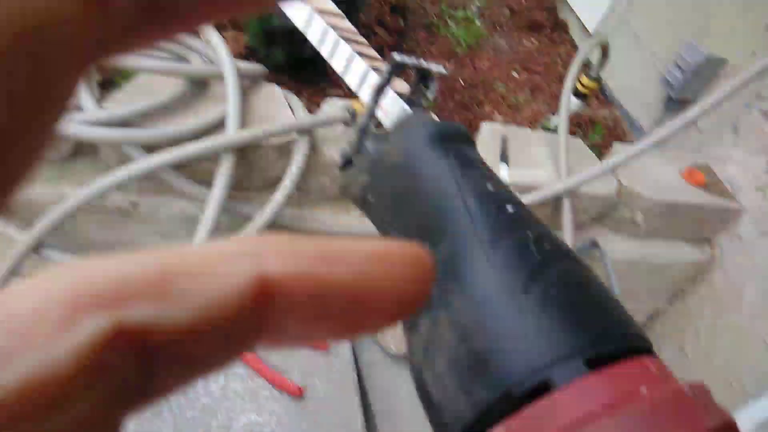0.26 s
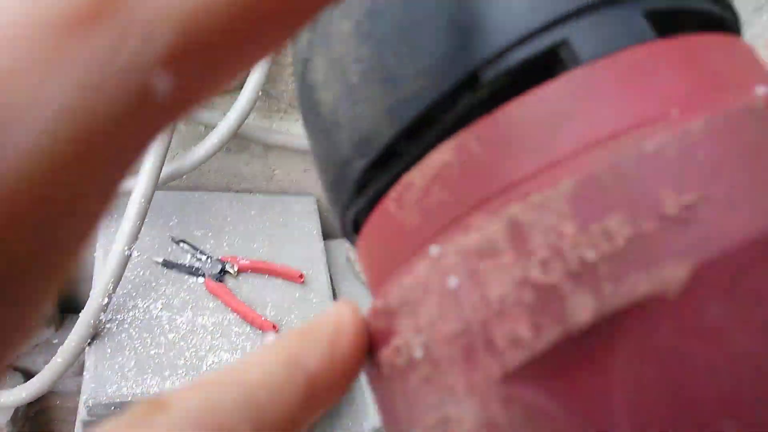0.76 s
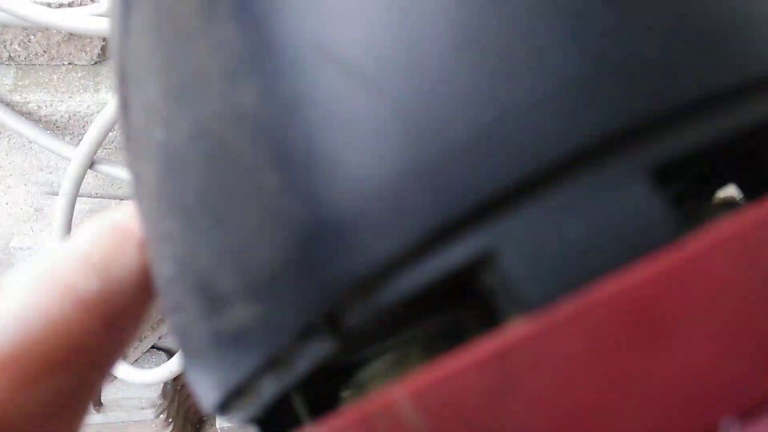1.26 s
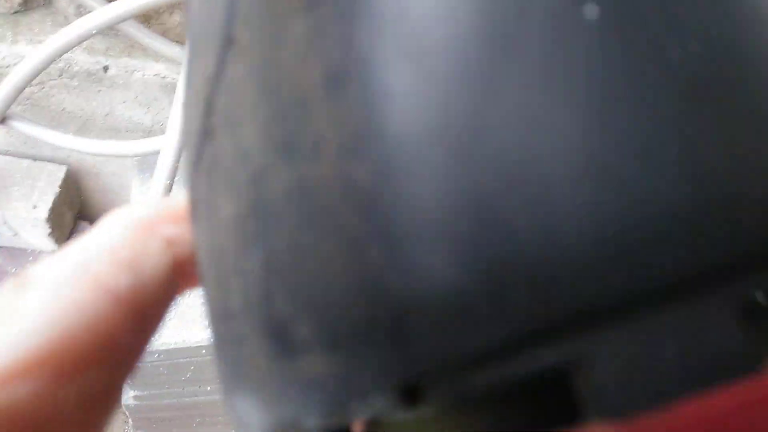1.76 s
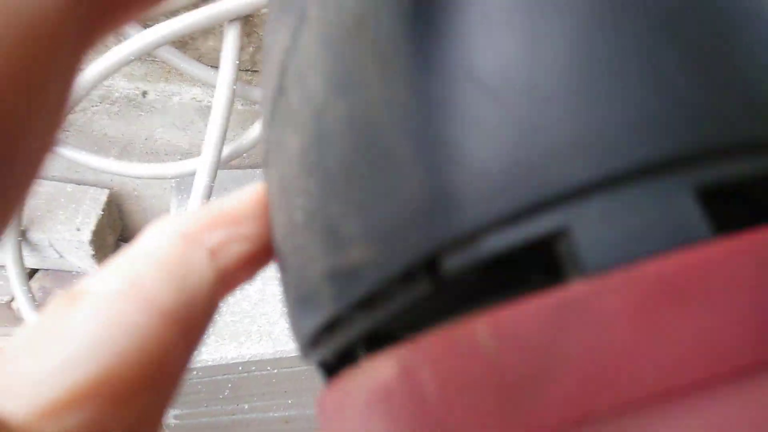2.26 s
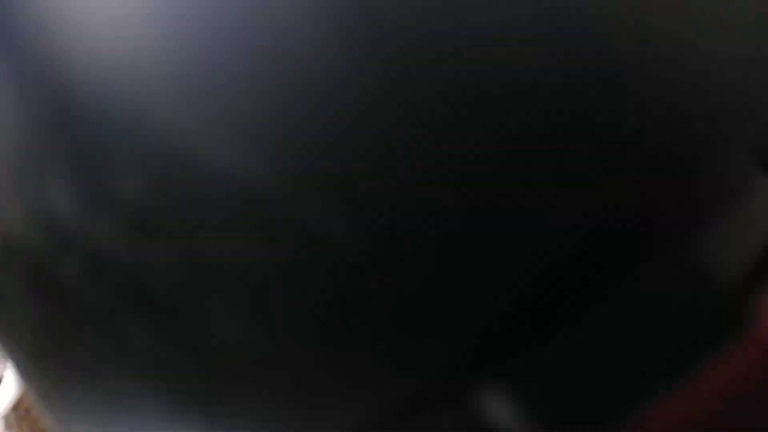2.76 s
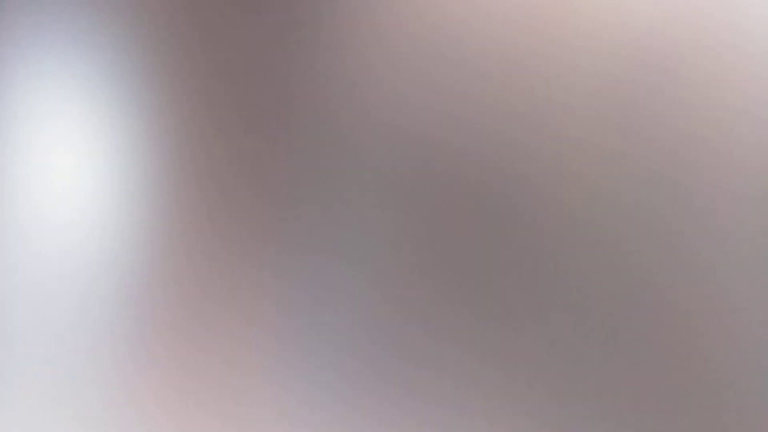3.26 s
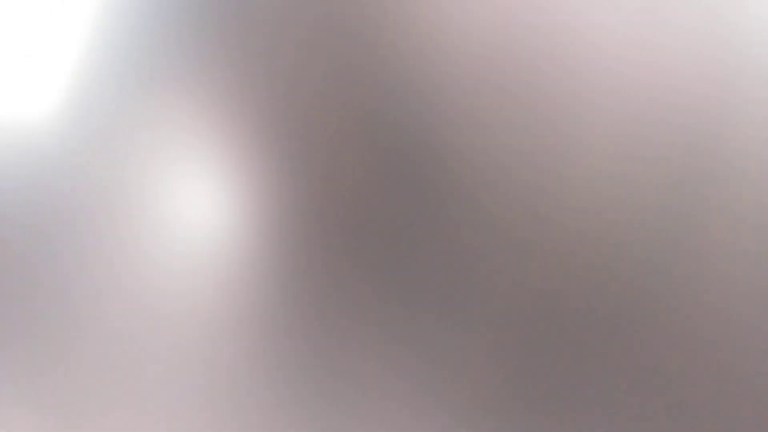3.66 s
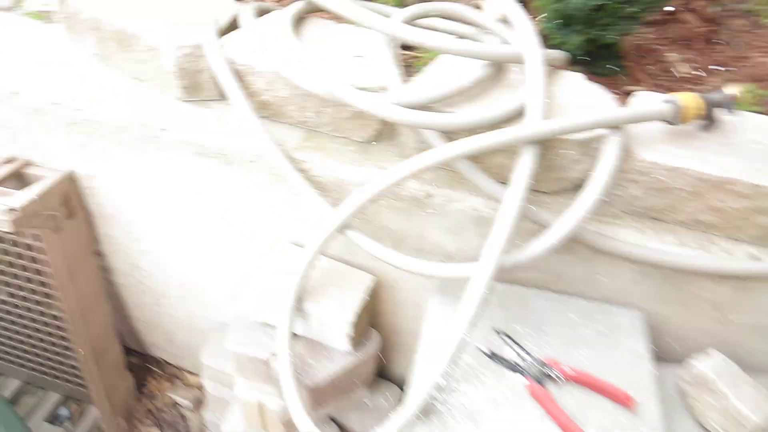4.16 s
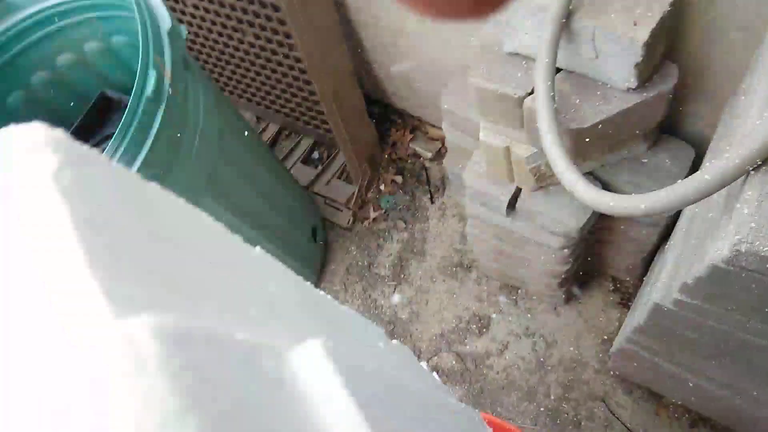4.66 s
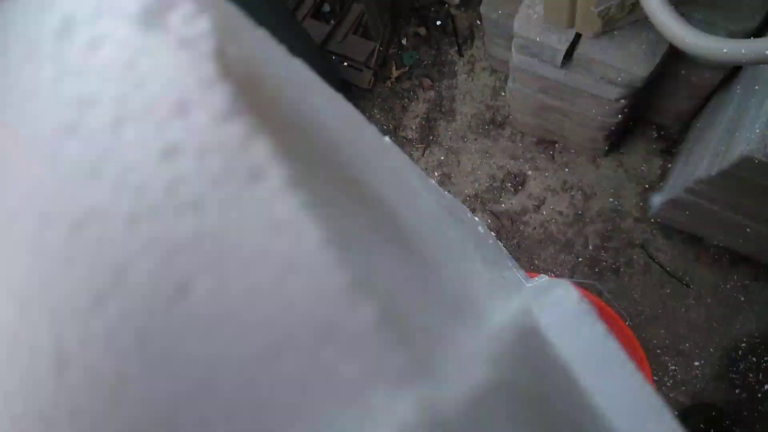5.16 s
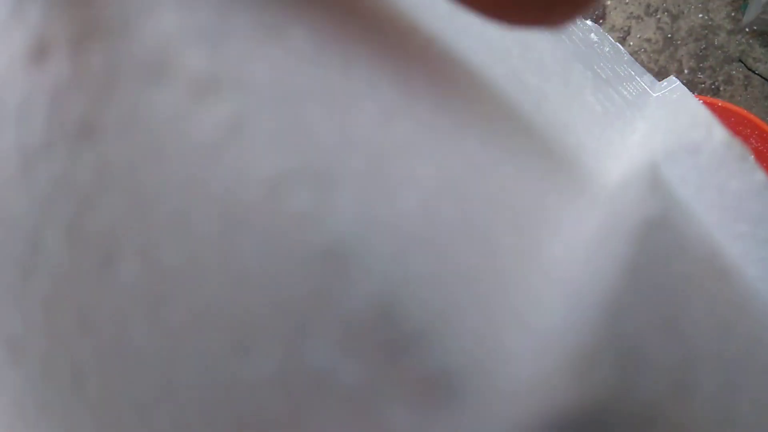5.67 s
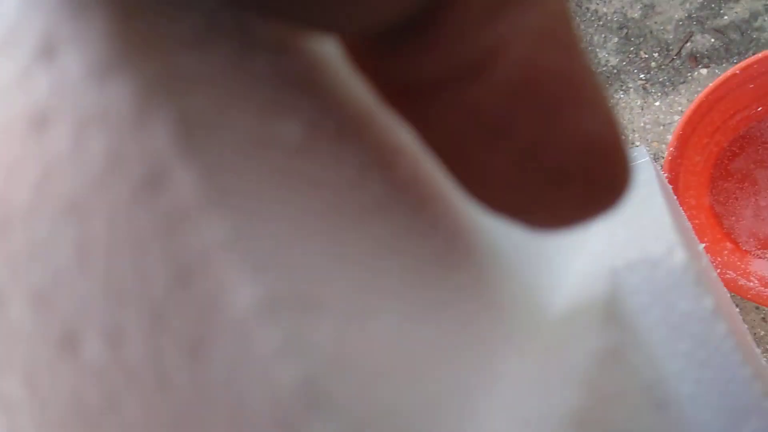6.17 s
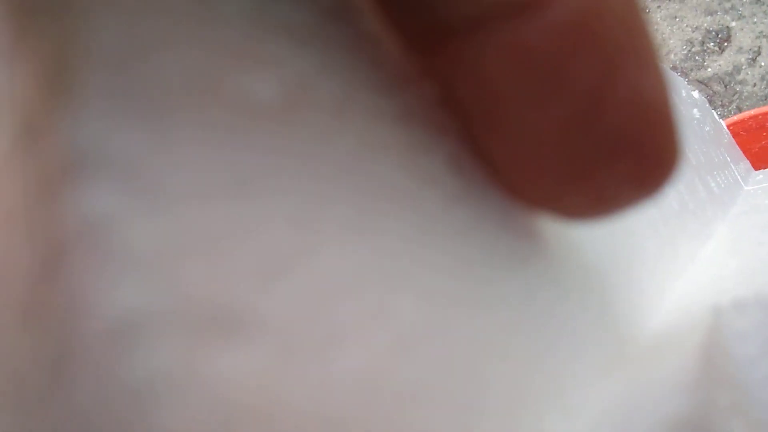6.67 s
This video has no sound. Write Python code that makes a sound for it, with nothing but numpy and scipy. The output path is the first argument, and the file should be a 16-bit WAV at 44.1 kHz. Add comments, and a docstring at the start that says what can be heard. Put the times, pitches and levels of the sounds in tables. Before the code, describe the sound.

Nearly silent at first, with a hand rubbing and shifting on a tool, dull thumps and crisp catch clicks near the microphones. Then the trigger cracks and an electric saw surges to full speed, overloading slightly, its plunger hammering too fast to count. The roar shifts from right to left, its low airflow easing on the right, while tones waver and gusts bump the left microphone until the cut-off.

```python
"""Outdoors, a hand-held reciprocating saw is gripped with rustles, bumps and clicks, then switched on near two microphones.
Filtered noise makes the rubbing hand and moving air; decaying modes of the plastic shell make the clicks ring.
The armature winds up: harmonics of its rotation whine, the plunger knocks on the shell, gears whir and fan air hisses.
Then the tool swings round to the left and a little away. The loudest peaks are clipped."""
import sys
import numpy as np
from scipy import signal
from scipy.io import wavfile
from scipy.ndimage import uniform_filter1d, map_coordinates

SR = 44100
rng = np.random.default_rng(int(sys.argv[2]) if len(sys.argv) > 2 else 0)


def amplitude_ratio(level_db):
    """Convert a level in decibels to the matching linear amplitude (field) ratio."""
    exponent = np.asarray(level_db, float) / 20
    return 10 ** exponent


def master(y):
    """Save y as 16-bit WAV."""
    cut = np.clip(np.atleast_2d(y).T, -1, 1)
    pcm = np.round(cut * 32767)  # scale
    wavfile.write(sys.argv[1], SR, pcm.astype(np.int16))


N = 305613

PINION, WHEEL = 10, 92  # gear teeth: the wheel makes one stroke a turn
ON_S, FULL_TURNS_PER_S, SAG_TURNS_PER_S2 = 1.698, 399.07, 0.424  # the armature sags a little as it warms
# the tool swings from the right microphone to the left, and later rolls its vents back into view
SWING_S, SWING_LENGTH_S, ROLL_S, ROLL_LENGTH_S = 3.95, 0.595, 4.9, 0.5


def evened(x):
    """Normalization by mean power: each channel gets rms 1."""
    return x / np.sqrt(np.mean(x ** 2, -1, keepdims=True) + 1e-20)


def columns(rows):
    """Linear interpolation in time: table columns become one value a sample."""
    s, *values = np.transpose(rows)
    return [np.interp(np.arange(N) / SR, s, v) for v in values]


def placed(db, left_minus_right_db):
    """Powers of unrelated signals add: gains of two such channels whose mean has the level db."""
    return 2 * amplitude_ratio(db) / np.sqrt(1 + amplitude_ratio([-left_minus_right_db, left_minus_right_db]) ** 2)


def wander(hz):
    """Low-passed white noise: a slow random curve of rms 1 for each channel."""
    low_pass = signal.butter(2, hz, fs=SR, output="sos")
    return evened(signal.sosfilt(low_pass, rng.standard_normal((2, N))))


def noise(colour, patchy_db):
    """Random short-time spectra with drifting patches, unrelated left and right, superpose to coloured noise."""
    hz = np.fft.rfftfreq(1024, 1 / SR)
    colour_hz, colour_db = np.transpose(colour)
    real, imaginary, patches = rng.standard_normal((N // 256 + 5, 513, 2, 3)).T
    patches = uniform_filter1d(patches, size=14, axis=1)  # along frequency
    patches = uniform_filter1d(patches, size=12, axis=2)  # along time
    shape_db = np.interp(np.log(hz + 1), np.log(colour_hz), colour_db)[:, None]
    shape_db = shape_db + patchy_db * patches / patches.std()
    spectra = (real + 1j * imaginary) * amplitude_ratio(shape_db)
    return evened(signal.istft(spectra, nperseg=1024, noverlap=768)[1][:, :N])


def swells(s, length, db):
    """Powers of unrelated events add: the gain of summed flat-topped swells."""
    u = (np.arange(N) / SR - np.c_[s]) / np.c_[length]
    shape = np.clip(np.minimum(2.2 * u, 0.96 * (1.15 - u)), 0, 1)
    return np.sqrt((amplitude_ratio(np.c_[db]) ** 2 * shape ** 2).sum(0))


def ramp(s, length):
    """A squared-sine transition rises smoothly from 0 to 1."""
    return np.sin(np.pi / 2 * np.clip((np.arange(N) / SR - s) / length, 0, 1)) ** 2


def speed():
    """Exponential approach to full speed: armature turns per second."""
    # the two stages, quick and slow: missing_turns_per_s at the start, time_constant_s
    wind_up = [(211.5, .127), (133.2, .448)]
    t = np.maximum(np.arange(N) / SR - ON_S, 0)
    missing = sum(gap * np.exp(-t / lag_s) for gap, lag_s in wind_up)
    return FULL_TURNS_PER_S - SAG_TURNS_PER_S2 * t - missing


def heard_db(levels_db, rule, start=SWING_S, length=SWING_LENGTH_S):
    """Level grows with the logarithm of motor speed and follows the swing of the tool.

    levels_db: left, right before, left, right after; rule: dB per octave of speed, dB at mid-swing, dB lost per s."""
    before, after = np.reshape(levels_db, (2, 2, 1))
    spin_db, sweep_db, fade_db_per_s = rule
    swing = ramp(start, length)
    since = np.maximum(np.arange(N) / SR - start - length, 0)
    moving = [4 * sweep_db * swing * (1 - swing), -fade_db_per_s * since]  # left, right
    return before + (after - before) * swing + moving + spin_db * np.log2(speed() / FULL_TURNS_PER_S)


def left_lag_ms():
    """Path difference sets arrival time: how much later the left microphone hears the tool."""
    before_ms, after_ms = 0.7535, -0.764
    return before_ms + (after_ms - before_ms) * ramp(SWING_S, SWING_LENGTH_S)


def from_one_spot(pair):
    """Partial coherence: a share of the right channel reaches the left as well, after the path delay."""
    alike, lag_waver_ms = 0.28, 0.04  # the delay wavers with the hand's unsteadiness
    lag_ms = left_lag_ms() + lag_waver_ms * wander(1.03)[0]
    at = np.arange(N) - lag_ms * SR / 1000
    common = map_coordinates(pair[1], [at], order=3)
    return np.array([alike * common + np.sqrt(1 - alike ** 2) * pair[0], pair[1]])


def rustle():
    """Friction noise: light strokes mostly brush; firm ones add grainy rubbing of skin, duller at the right."""
    # strokes of hand and cloth: start_s, length_s, left_db, right_db
    strokes = [(-.2, 1, -79, -64), (0.197, 0.29, -61, -54), (0.413, 0.058, -76, -43),
               (0.533, 0.3, -78, -55.5), (0.786, 0.16, -76, -53), (0.887, 0.29, -62, -43.5),
               (1.034, 0.18, -42, -39), (1.185, 0.27, -43, -39), (1.443, 0.43, -71, -56),
               (1.514, 0.038, -62, -43.5), (1.656, 0.16, -48, -28)]
    # spectrum of rubbing at each microphone: frequency_hz, density_db (per Hz)
    rub_left = [(200, -15), (1000, 2), (2500, -10), (5500, -11), (8000, -6), (11300, -7), (12500, -40)]
    rub_right = [(200, -34), (900, -0.5), (2200, -7), (4000, -3.5), (6000, -11), (9000, -33), (12500, -49)]
    # spectrum of brushing cloth: frequency_hz, density_db (per Hz)
    brush_colour = [(1500, -38), (2500, 2.5), (3200, 1.5), (4000, 2.5), (4800, 0.5), (7000, -14),
                    (11000, -10), (12500, -42)]
    firm_right_db, firm_growth, brush_db, brush_top_db = -42, 0.67, -2, -50
    s, length, *sides_db = np.transpose(strokes)
    rub = np.array([noise(rub_left, patchy_db=3.5)[0], noise(rub_right, patchy_db=2.5)[1]])
    grainy = evened(rub * amplitude_ratio(5.3 * wander(140)))
    # firmer strokes bring out more rubbing, while brushing stops growing at brush_top_db
    firm_db = firm_growth * np.minimum(sides_db[1] - firm_right_db, 0)
    rub_gain = np.array([swells(s, length, db + firm_db) for db in sides_db])
    brush_gain = np.array([swells(s, length, np.minimum(db, brush_top_db) + brush_db) for db in sides_db])
    return rub_gain * grainy + brush_gain * noise(brush_colour, patchy_db=4.5)


def running():
    """Switching envelope: a short linear rise once the trigger closes."""
    return np.clip((np.arange(N) / SR - ON_S) / 0.0085, 0, 1)


def buffet():
    """Turbulent pressure is local: lumpy low noise, unrelated at the two ports; the gusts are deeper."""
    # spectra of steady buffeting and of gusts: frequency_hz, density_db (per Hz)
    steady_colour = [(25, -47), (75, -4.5), (120, -1), (220, 0.5), (400, -2), (800, -3.5), (1500, -49),
                     (3000, -98)]
    gust_colour = [(25, -19), (70, 6.5), (130, 8.5), (220, -4.5), (500, -11), (3000, -84)]
    # gusts on the left port: start_s, length_s, level_db
    gust_times = [(3.507, 0.064, -15), (4.142, .16, -20.5), (4.416, 0.28, -17), (5.884, 0.048, -17),
                  (6.165, 0.2, -16), (6.396, 0.066, -19.5), (6.46, 0.38, -7), (6.851, 0.065, -18.5)]
    # low rumble while the hand shifts its grip: start_s, length_s, left_db, right_db
    grip = [(0.91, 0.2, -70, -48), (1.1, 0.44, -58, -59)]
    still_air_db = np.array([[-72], [-88]])  # left, right
    # the jet of cooling air leaves the right port from 3.82 s, over 0.45 s
    jet_db = heard_db((-26, -16, -35.5, -41), (9.5, 9.6, 0.8), start=3.82, length=0.45)
    s, length, left_db, right_db = np.transpose(grip)
    level = running() * amplitude_ratio(jet_db) + [swells(s, length, left_db), swells(s, length, right_db)]
    steady = level * evened(noise(steady_colour, patchy_db=1.4) * amplitude_ratio(1.3 * wander(12)))
    gusty = evened(noise(gust_colour, patchy_db=0.0) * amplitude_ratio(4.7 * wander(18.0)))[0]
    still_air = amplitude_ratio(still_air_db) * noise(gust_colour, patchy_db=5.0)
    return steady + still_air + [swells(*np.transpose(gust_times)) * gusty, np.zeros(N)]


def thumps():
    """Damped oscillation: the hand bumps the body that holds the microphones, near the right one."""
    # bumps at the right microphone: start_s, level_db (before the soft onset), pitch_hz, t60_s
    bumps = [(0.926, -17, 113, 0.076), (0.968, -8.5, 152, 0.019), (1.049, -37, 89.5, 0.24)]
    out, t = np.zeros((2, N)), np.arange(6000) / SR
    for s, db, hz, t60 in bumps:
        onset = (1 - np.exp(-t / 0.0042)) ** 2
        bump = onset * amplitude_ratio(db - 60 * t / t60) * np.sin(2 * np.pi * hz * t)
        out[:, round(s * SR):][:, :len(t)] += amplitude_ratio([[-26], [0]]) * bump
    return out


def housing(tilt_db, scatter, focus_db=(0, 0)):
    """Modal superposition: the plastic shell rings, and each microphone hears its modes in other phases.

    tilt_db and focus_db (left, right) count per octave from the mode at 1755 Hz."""
    # modes of the shell: pitch_hz, level_db (before tilt and focus), t60_s
    shell_modes = [(535, -19.5, 0.012), (854, -10, .017), (1205, -4, 0.016), (1632, -3.5, 0.015),
                   (1755, -2.5, 0.02), (1940, -9, 0.025), (2760, -1.5, 0.024), (3720, -6, .012),
                   (4100, -8, 0.01), (4970, -3.5, 0.002), (6700, -19.5, 0.003), (7800, -15, 0.0026)]
    hz, db, t60 = np.transpose(shell_modes)[:, :, None]
    t = np.arange(3000) / SR
    phase = scatter * rng.uniform(-np.pi, np.pi, (2, len(shell_modes), 1))
    octaves = np.log2(hz / 1755)
    mode_db = db + tilt_db * octaves + np.reshape(focus_db, (2, 1, 1)) * abs(octaves)
    modes = amplitude_ratio(mode_db - 60 * t / t60) * np.sin(2 * np.pi * hz * t + phase)
    modes[:, ::2] *= -1  # neighbours in opposite phase fill the valleys between them
    return modes.sum(1) * np.minimum(t / 0.00085, 1)


def clicks():
    """Impulsive excitation: milliseconds of snapping ring the housing; near walls add a short tail."""
    # clicks of catch and trigger: start_s, level_db (of the peaks, relative), left_minus_right_db,
    # tilt_db (brightness per octave)
    snaps = [(0.926, -31, -13, 14), (0.971, -31, -11, 4), (1.075, -2, -11, 6), (1.143, -19, 1, -17),
             (1.188, -23, -6, -2), (1.233, -20, -10, 1), (1.253, -11.5, -4, 16.5), (1.299, 4.5, -9, 9),
             (1.338, -21, -3, 7), (1.41, -25, -3, -4), (1.522, -35, -14, -6), (1.648, -33, -8, -3),
             (1.699, 9.5, -8, 1)]
    out, t = np.zeros((2, N)), np.arange(3000) / SR
    for s, db, left_minus_right_db, tilt_db in snaps:
        snap = rng.standard_normal(300) * np.exp(-t[:300] / 0.0018)
        body = housing(tilt_db, scatter=0.81)
        body *= np.exp(-t / 0.005)  # the gripping hand damps the shell
        body[:, :5] += amplitude_ratio(-20.0 + 0.87 * tilt_db)  # the dry crack, heard directly
        ring = signal.fftconvolve(body, snap[None], axes=1)[:, :len(t)]
        ring /= abs(ring).max(1, keepdims=True)
        out[:, round(s * SR):][:, :len(t)] += ring * placed(db - 7.5, left_minus_right_db)[:, None]
    tail = rng.standard_normal((2, 6000)) * amplitude_ratio(-60 * np.arange(6000) / SR / 0.039)  # t60 39 ms
    return out + amplitude_ratio(-41.5) * signal.oaconvolve(out, tail, axes=1)[:, :N]


def shaft_turns():
    """Phase is the integral of speed: turns of the slightly unsteady armature so far."""
    return np.cumsum(speed() * (1 + 0.000609 * wander(12.0)[0])) / SR


def whine(turns):
    """Harmonics of rotation: commutator and gear-mesh tones waver and throb; the stroke hums below."""
    # whine tones: order (multiple of shaft speed), left_db, right_db (relative),
    # share (of the level that follows octave_db), throb (depth, twice a stroke)
    partials = [(10, -6, -9, .4, .8), (12, 0, 0, 0, .1), (23, -14, -28, .7, .1), (24, -3, -22, 1, .1),
                (36, -22, -29, .6, .1)]
    # hum tones: order (multiple of the stroke rate), level_db (mean of the wavering level)
    hum = [(3, -54), (5, -48), (6, -47), (7, -49), (8, -48)]
    # brief swells and fades as the tool shifts: start_s, length_s, left_db, right_db, octave_db
    fades = [(2.65, 0.48, -10, 17, -8), (4.293, 0.27, -10, -4, -13), (4.55, 0.57, 4, 2, -18),
             (4.82, 0.22, -14, 2, -2), (4.99, 0.48, 2.8, 2, -18), (5.6, 0.4, -9, -9, -4),
             (6.17, 0.2, -5, -10, -2), (6.3, 0.34, -15, 3, 1), (6.6, .5, -8, 3, 1)]
    s, length, *depths_db = np.transpose(fades)
    arch = np.sin(np.pi * np.clip((np.arange(N) / SR - np.c_[s]) / np.c_[length], 0, 1))
    left_db, right_db, octave_db = np.array(depths_db) @ arch
    # the rising whine swells as it crosses the shell's modes
    shell_hz, shell_width_hz, shell_db = 2550, 700, (17, 25)  # shell_db: left, right
    crossing = 1 / (1 + (2 * (12 * speed() - shell_hz) / shell_width_hz) ** 2)
    sides_db = heard_db((-24, -30, -21, -24), (12, 1.5, 0.1)) + [left_db, right_db] + np.outer(shell_db, crossing)
    octave_db = octave_db - 19 + 18 * np.log2(speed() / FULL_TURNS_PER_S)  # 18 dB per octave of speed
    mesh_near_db = 7 * (1 - ramp(SWING_S, SWING_LENGTH_S))  # the gear mesh is more exposed before the swing
    strokes = turns * PINION / WHEEL
    out = np.zeros((2, N))
    for order, left_rel_db, right_rel_db, share, throb in partials:
        db = (1 - share) * sides_db + share * octave_db + np.array([[left_rel_db], [right_rel_db]])
        db = db + (order == PINION) * mesh_near_db
        drift = 0.5 * wander(5)  # radians; the paths to the two microphones change by centimetres
        tone = np.sqrt(2) * np.sin(2 * np.pi * round(order) * turns + drift)
        out += amplitude_ratio(db + 3 * wander(18)) * (1 + throb * np.cos(4 * np.pi * strokes)) * tone
    for order, db in hum:
        out += amplitude_ratio(db + 3 * wander(5)) * np.sqrt(2) * np.sin(2 * np.pi * order * strokes)
    return out


def knocks(turns):
    """Periodic impacts drive a resonator: the plunger strikes at both stroke ends, over rattle and a steady grind."""
    # level of the knocking, joined by straight lines: time_s, level_db, left_minus_right_db
    knock_levels = [(1.7, -11.5, -3.5), (2.35, -17, -14), (3.47, -9, -21), (4.4, -26, 5),
                    (4.95, -28.5, 3.5), (5.35, -21.5, -1), (6.46, -18, -5.5), (6.93, -16, -7)]
    strokes = turns * PINION / WHEEL
    late = strokes + 0.0025 * wander(30)[0]
    slap = np.exp(-(2 * late % 1) / 0.03) * (1 + 0.087 * np.cos(2 * np.pi * late))
    slap *= amplitude_ratio(2.5 * wander(40.6)[0])
    rattle = (1.35 + slap) * rng.standard_normal(N)
    stroke_ends = np.diff(np.floor(2 * strokes), prepend=0)
    strikes = 17 * (speed() / FULL_TURNS_PER_S) ** 2 * stroke_ends * amplitude_ratio(3 * wander(3)[0])
    shared = rattle + strikes
    at, lag = np.arange(N), left_lag_ms() * SR / 1000
    drive = np.array([np.interp(at - lag, at, shared), shared])
    facing_shell = housing(tilt_db=0, scatter=0.1)
    turned_shell = housing(tilt_db=-4.1, scatter=0.13, focus_db=(1.5, -8))
    facing = signal.oaconvolve(drive, facing_shell, axes=1)[:, :N]
    turned = signal.oaconvolve(drive, turned_shell, axes=1)[:, :N]
    away = ramp(SWING_S, SWING_LENGTH_S)
    rung = (1 - away) * evened(facing) + away * evened(turned)
    return placed(*columns(knock_levels)) * evened(rung)


def whir(turns):
    """Amplitude-modulated noise: gear teeth whir with the load of the stroke."""
    # spectrum of the whir: frequency_hz, density_db (per Hz)
    whir_colour = [(120, -60), (400, -13.5), (1000, -6.5), (1900, -2.5), (2400, -4.5), (2750, -8),
                   (3150, -3.5), (3750, -3.5), (4900, -3.5), (6000, -10.5), (7500, -13), (10000, -61),
                   (15500, -78)]
    load = np.cos(8 * np.pi * turns * PINION / WHEEL)
    level = amplitude_ratio(heard_db((-7, -3.5, -10, -8.5), (7.4, 1.25, 1.7)))
    out = level * (1 + 0.038 * load) * from_one_spot(noise(whir_colour, patchy_db=1.1))
    # once the tool is away the right microphone loses part of the low whir
    thin_hz, thin_db = 1450, -5
    low = signal.sosfiltfilt(signal.butter(2, thin_hz, fs=SR, output="sos"), out[1])
    out[1] -= (1 - amplitude_ratio(thin_db * ramp(SWING_S, SWING_LENGTH_S))) * low
    return out


def hiss():
    """Broadband friction and flow noise: brushes and fan hiss, shadowed at high frequencies by the body."""
    # spectrum of the hiss: frequency_hz, density_db (per Hz)
    hiss_colour = [(4000, -33), (6000, 0.5), (7600, 7.5), (9000, 2.5), (11300, 1), (12500, -6.5),
                   (14000, -3), (15600, -5.5)]
    air = from_one_spot(noise(hiss_colour, patchy_db=1.9))
    # between swing and roll the body hides the vents and dulls the hiss
    shade_hz, shade_db = 9870, -7
    hidden = ramp(SWING_S, SWING_LENGTH_S) - ramp(ROLL_S, ROLL_LENGTH_S)
    top = signal.sosfiltfilt(signal.butter(4, shade_hz, "high", fs=SR, output="sos"), air)
    shaded = air - (1 - amplitude_ratio(shade_db * hidden)) * top
    return amplitude_ratio(heard_db((-12.5, -13.5, -10, -75), (9.8, 6.2, 7.6))) * shaded


def scene():
    """Superposition of the saw, the air it blows and the hand that holds it."""
    hand = rustle() + thumps() + clicks()
    turns = shaft_turns()
    saw = whine(turns) + knocks(turns) + whir(turns) + hiss()
    return hand + buffet() + running() * saw


def roll_off(x):
    """The treble ends steeply here."""
    return signal.sosfilt(signal.butter(12, 15630, fs=SR, output="sos"), x)


def record(dry):
    """Saturation: the overloaded converter clips hard just below full scale."""
    mix = np.clip(dry, -0.98, 0.98)
    return roll_off(mix)


dry = scene()
out = record(dry)
master(out)
```